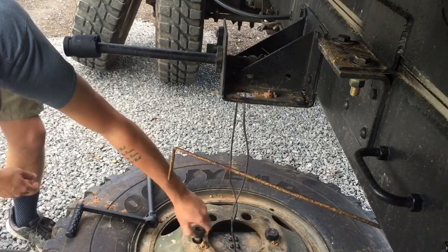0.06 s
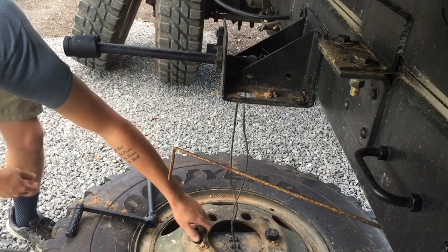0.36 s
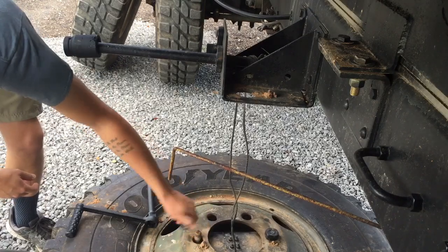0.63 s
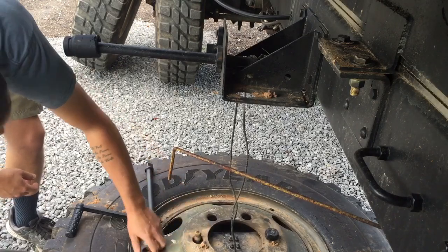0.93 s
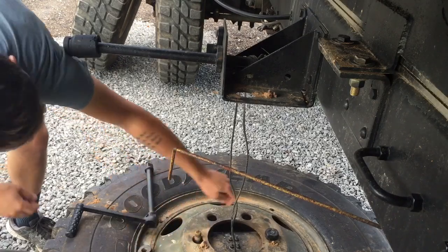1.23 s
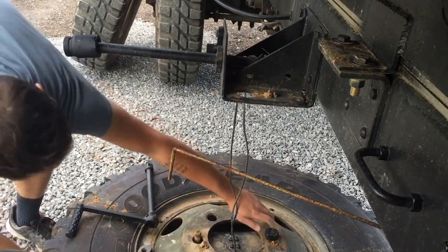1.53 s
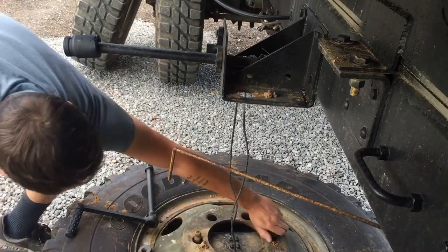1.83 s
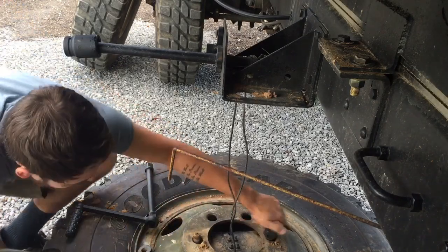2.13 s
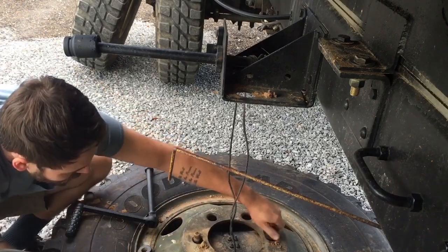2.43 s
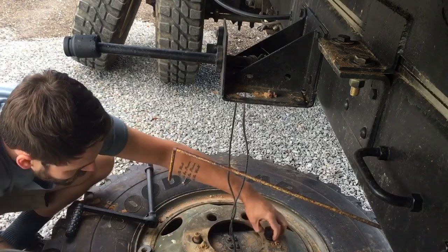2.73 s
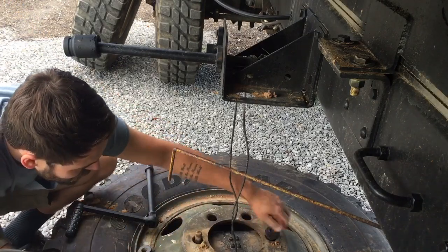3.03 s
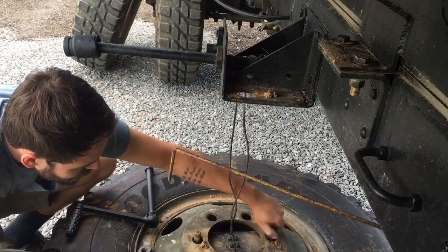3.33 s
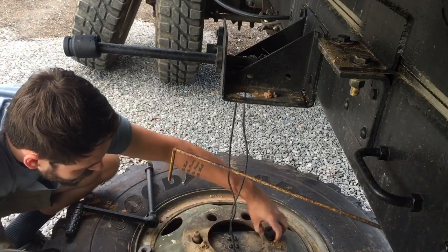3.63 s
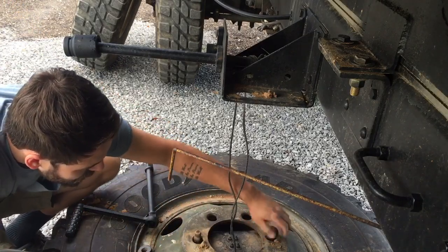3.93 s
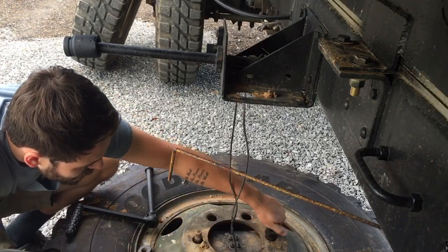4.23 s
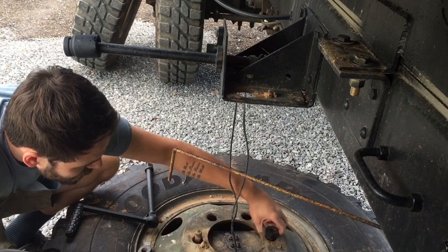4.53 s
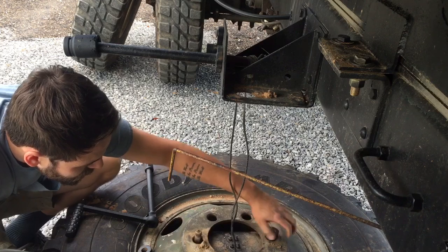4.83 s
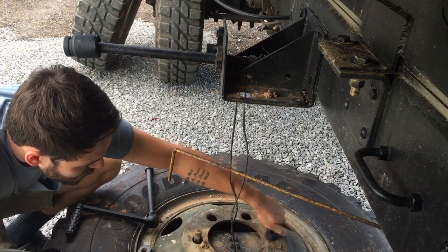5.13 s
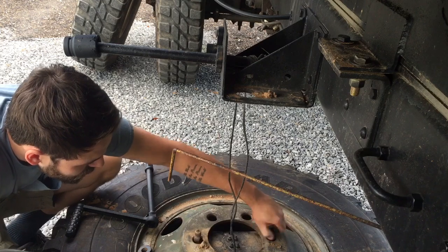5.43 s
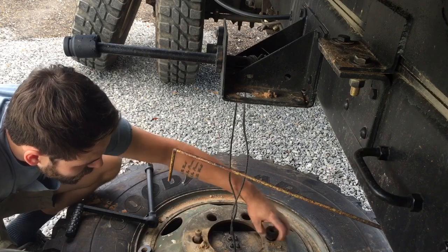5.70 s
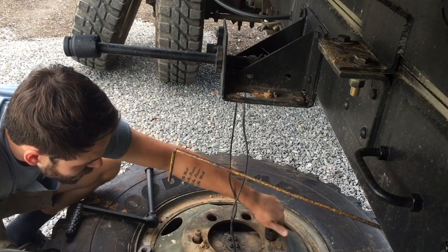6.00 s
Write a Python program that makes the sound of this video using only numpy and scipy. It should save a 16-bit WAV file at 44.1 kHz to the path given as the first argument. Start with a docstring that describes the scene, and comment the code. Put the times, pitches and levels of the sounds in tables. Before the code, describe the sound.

Outdoors, loose nuts click and scrape on a steel wheel's studs in short, ringing bursts, over a faint, distant engine idle.

```python
"""Lug nuts spun by hand on the studs of a steel truck wheel lying on gravel outdoors.
A loose nut rasps and knocks on its thread, ringing itself, the stud and the wheel;
once the dry thread squeals by stick-slip. Steel clacks twice, a sleeve brushes, a shoe grinds gravel.
Far off, an engine idles and insects shrill."""
import sys
import numpy as np
from scipy import signal
from scipy.fft import rfft, irfft, next_fast_len
from scipy.io import wavfile
from scipy.ndimage import map_coordinates

SR = 44100
rng = np.random.default_rng(int(sys.argv[2]) if len(sys.argv) > 2 else 0)


def file_out(sig):
    """Save sig as 16-bit WAV at sys.argv[1]."""
    # one column per channel
    cols = np.atleast_2d(sig).T
    # limit, then scale
    lim = np.clip(cols, -1, 1)
    pcm = np.round(lim * 32767).astype(np.int16)
    wavfile.write(sys.argv[1], SR, pcm)


N = 267246
TIME = np.arange(N) / SR
RING_TIME = TIME[:SR // 3]
LEAD_S = .03  # run-up before a rattle or chirp


def undb(db):
    """Decibels to gain."""
    return 10 ** (np.asarray(db) / 20)


def unit(x, span_s=None):
    """Scale to rms 1, over the first span_s if given."""
    return x / np.sqrt(np.mean(x[:int(span_s * SR) if span_s else None] ** 2) + 1e-20)


def add(out, start_s, x):
    """Mix x into out from start_s."""
    i = int(start_s * SR)
    x, i = x[max(-i, 0):], max(i, 0)
    out[i:i + len(x)] += x[:N - i]


def colour(x, points):
    """Minimum-phase filter through (f/Hz, level/dB) points."""
    size = 2 * next_fast_len(len(x))
    hz, db = np.transpose(points)
    bins_hz = np.arange(size // 2 + 1) * SR / size
    gain = undb(np.interp(np.log(bins_hz + 1), np.log(hz), db))
    cepstrum = irfft(np.log(gain))
    cepstrum[1:size // 2] *= 2
    cepstrum[size // 2 + 1:] = 0
    return irfft(rfft(x, size) * np.exp(rfft(cepstrum)))[:len(x)]


def walk(rate_hz, like=TIME):
    """Smooth random drift, spread near 1."""
    knots = rng.standard_normal(int(len(like) / SR * rate_hz) + 3)
    return map_coordinates(knots, [np.arange(len(like)) / SR * rate_hz], order=2, mode="nearest")


def drive(force, response):
    """Sound of a body under a force."""
    return signal.fftconvolve(force, response)[:len(force)]


def ring(modes, scatter_db=4.5, detune=.001, damping=1.034):
    """Modal impulse response; each contact point weights the modes anew, fingers damp them."""
    out = 0
    for (hz, db, t60_s), (gain, shift, sign) in zip(modes, rng.standard_normal((len(modes), 3))):
        phase = 2 * np.pi * hz * (1 + detune * shift) * RING_TIME
        decay = np.exp(-np.log(1000) * damping * RING_TIME / t60_s)
        out = out + np.sign(sign) * undb(db + scatter_db * gain) * np.sin(phase) * decay
    return out


def dense_ring(t60_s, late_db, late_t60_s):
    """Countless short modes as decaying noise, plus a faint longer echo."""
    decay = -np.log(1000) * RING_TIME
    envelope = np.exp(decay / t60_s) + undb(late_db) * np.exp(decay / late_t60_s)
    return rng.standard_normal(len(RING_TIME)) * envelope


def chatter(attack_s, hold_s, release_s, rate_hz, spread_db, rub_db=-16, rub_s=.006):
    """Tiny impacts: a light rub for LEAD_S, then the nut catches, rocks and settles."""
    t = TIME[:SR // 2] - LEAD_S
    swell = np.sqrt(np.clip(t / attack_s, 0, 1)) * np.exp(-np.maximum(t - hold_s, 0) / release_s)
    rub = undb(rub_db) * np.exp(-np.abs(t) / rub_s)
    hits = (rng.random(len(t)) < rate_hz / SR) * rng.choice([-1, 1], len(t))
    return (swell + rub) * hits * undb(spread_db * rng.standard_normal(len(t)))


def air(level_db=-65):
    """Faint open-air hiss."""
    # f/Hz, level/dB
    spectrum = [(150, -12), (300, -4), (450, -3), (800, -2), (1500, -9), (2500, -13), (3700, -13),
                (5000, -18), (6200, -17), (7500, -14), (9500, -22), (15500, -23)]
    return unit(colour(rng.standard_normal(N), spectrum)) * undb(level_db + .5 * walk(5))


def engine(rumble_db=-48, waver=.008, throb_db=1.5):
    """Distant idle: orders waver with engine speed over a rumble."""
    # engine orders: f/Hz, level/dB
    orders = [(52, -58), (77, -60.5), (103, -56.5), (124, -48), (154, -55.5), (205, -57.5), (229, -70),
              (247, -68.5)]
    # f/Hz, level/dB
    rumble_spectrum = [(20, -28), (35, -20), (52, 0), (75, -1.5), (130, 3.5), (175, -7), (235, -2),
                       (290, -17.5), (450, -25.5), (1000, -63.5)]
    speed = 1 + waver * walk(3)
    hum = 0
    for hz, db in orders:
        amplitude = np.sqrt(2) * undb(db + throb_db * walk(9))
        phase = 2 * np.pi * np.cumsum(hz * speed) / SR + .5 * walk(11)
        hum += amplitude * np.sin(phase)
    return hum + undb(rumble_db) * unit(colour(rng.standard_normal(N), rumble_spectrum))


def insects(hz=6850, level_db=-76, swell_db=2.5):
    """Thin, far shrill that comes and goes."""
    band = [(hz - 1200, -40), (hz - 300, -14), (hz - 90, 0), (hz + 90, 0),
            (hz + 300, -10), (hz + 900, -12), (hz + 2000, -40)]
    return unit(colour(rng.standard_normal(N), band)) * undb(level_db + swell_db * walk(9.6))


def sleeve(peak_s=1.36, width_s=.06, level_db=-68):
    """Cloth hisses as the arm reaches across."""
    hiss = unit(colour(rng.standard_normal(N), [(1000, -14), (7000, 0), (11000, -4), (15000, -1)]))
    return undb(level_db) * hiss * np.exp(-((TIME - peak_s) / width_s) ** 2)


def shoe(rate_hz=3000, spread_db=3.5, tail_s=.0037, hiss_db=-4, split_hz=1700):
    """Stones grind under a sole: dense short grains and a few lone snaps."""
    # gravel spectrum: f/Hz, level/dB
    gravel = [(100, -12), (220, -0.5), (350, 0), (520, -4), (750, -0.5), (1150, -1.5), (1600, -10),
              (2200, -11), (5000, -19.5), (8400, -22.5), (15500, -31.5)]
    # sole presses: peak t/s, rise/s, fall/s, level/dB, treble/dB
    scuffs = [(1.787, 0.0044, 0.017, -38.5, -14), (1.889, 0.087, 0.064, -36, 2.5),
              (2.188, 0.035, 0.018, -47, 5.5), (2.27, 0.0056, 0.022, -35, -14),
              (2.321, 0.0085, 0.031, -43, -1.5), (2.549, 0.076, 0.065, -43, -9), (2.9, .4, .2, -62.5, -22)]
    # snapping stones: t/s, level/dB, f/Hz
    stones = [(1.68, -53.5, 3480), (1.706, -50, 4360), (1.784, -44.5, 1650), (1.893, -42, 3030),
              (2.188, -65, 13000), (2.251, -58, 9000), (2.283, -46.5, 9200)]
    grains = (rng.random(N) < rate_hz / SR) * rng.standard_normal(N)
    grains *= undb(spread_db * np.minimum(rng.exponential(size=N), 4))
    tail = rng.standard_normal(len(RING_TIME)) * np.exp(-RING_TIME / tail_s)
    grind = unit(drive(grains, tail)) + unit(grains) + undb(hiss_db) * rng.standard_normal(N)
    crunch = unit(colour(grind, gravel)) * undb(walk(60))
    low = signal.sosfiltfilt(signal.butter(2, split_hz, fs=SR, output="sos"), crunch)
    out = np.zeros(N)
    for peak_s, rise_s, fall_s, db, treble_db in scuffs:
        width_s = np.where(TIME < peak_s, rise_s, fall_s)
        weight = np.exp(-np.abs((TIME - peak_s) / width_s) ** 1.3)
        out += undb(db) * weight * (low + undb(treble_db) * (crunch - low))
    for start_s, db, hz in stones:
        burst = dense_ring(t60_s=.02, late_db=-25.5, late_t60_s=.08)
        snap = colour(burst, [(hz / 5, -18), (hz, 0), (3 * hz, -18)])
        add(out, start_s, undb(db) * unit(snap, span_s=.0024))
    return out


def clacks(crack_db=-6, crack_s=.0012):
    """Steel set down on steel: a crack and a short, hand-damped ring."""
    # t/s, level/dB, ring/dB, spectrum (f/Hz, level/dB)
    blows = [(0.8939, -28, -8.5, [(150, -12), (420, -4), (900, -14), (2000, -18), (2600, -2.5),
             (3400, -4.5), (4200, -11), (8000, -11.5), (11000, -26), (15000, -52)]),
             (1.0322, -26.5, -12, [(150, -9), (300, -22), (430, 6), (700, -2.5), (1150, -5), (2000, -15.5),
             (3500, -13), (5000, -21), (7000, -26), (10000, -51), (15000, -64)])]
    # set-down steel: f/Hz, level/dB, nominal t60/s
    modes = [(460, -12, .06), (600, -12, .07), (1210, -7, .12), (1830, -12, .075), (2455, -4, .11),
             (3537, 0, .12), (4760, -11, .075), (6412, -8, .08), (7892, -12, .06)]
    out = np.zeros(N)
    for start_s, db, ring_db, spectrum in blows:
        crack = unit(rng.standard_normal(len(RING_TIME)) * np.exp(-RING_TIME / crack_s))
        body = unit(dense_ring(t60_s=.06, late_db=-30, late_t60_s=.22))
        body += undb(ring_db) * unit(ring(modes, scatter_db=0))
        clack = colour(body + undb(crack_db) * crack, spectrum)
        add(out, start_s, undb(db) * unit(clack, span_s=.017))
    return out


def chirp(hold_s, hz, rough_rad, glide_hz_per_s=0, attack_s=.0045, release_s=.007):
    """Brief stick-slip tone: grows for LEAD_S, holds, dies."""
    t = RING_TIME - LEAD_S
    phase = 2 * np.pi * (hz * t + glide_hz_per_s * t ** 2 / 2) + rough_rad * walk(700, t)
    return np.exp(np.minimum(t, 0) / attack_s - np.maximum(t - hold_s, 0) / release_s) * np.sin(phase)


def thread_tone(mode_hz=4467, flat_hz=195, waver=.0063, level_db=-10.5, flutter_db=2.3):
    """The dry thread sings by stick-slip, flat until it locks to its mode."""
    start_s, attack_s, hold_s, release_s = 1.949, .015, .038, .019
    lock_s, glide_s = 1.965, .002
    hz = mode_hz - flat_hz * (1 - np.tanh((TIME - lock_s) / glide_s)) / 2
    phase = 2 * np.pi * np.cumsum(hz * (1 + waver * walk(400))) / SR
    second = undb(-14) * np.sin(2 * phase + .35 * walk(900))
    third = undb(-33) * np.sin(3 * phase + .7 * walk(900))
    t = TIME - start_s
    envelope = np.clip(t / attack_s, 0, 1) * np.exp(-np.maximum(t - hold_s, 0) / release_s)
    return envelope * (np.sin(phase) + second + third) * undb(level_db + flutter_db * walk(250))


def squeal(skid_s=2.046, skid_db=-22, rasp_s=2.01, rasp_db=-32, echo_db=-19):
    """The thread's tone hops between modes, skids down and breaks into a rasp."""
    # mode hops: full-strength t/s, hold/s, f/Hz, level/dB
    hops = [(1.955, .045, 3172, -38.5), (2.011, 0.0028, 5280, -13), (2.011, 0.0025, 6150, -15.5),
            (2.014, 0.0035, 11580, -25.5), (2.017, 0.003, 7120, -21.5), (2.022, 0.021, 3220, -22.5),
            (2.028, 0.01, 5320, -21.5), (2.085, .018, 1770, -17.5), (2.085, 0.004, 3550, -22.5),
            (2.094, .008, 3185, -22.5), (2.486, .003, 3980, -29)]
    out = thread_tone()
    for full_s, hold_s, hz, db in hops:
        add(out, full_s - LEAD_S, undb(db) * chirp(hold_s, hz, rough_rad=.25))
    skid = chirp(hold_s=.016, hz=4900, rough_rad=1.8, glide_hz_per_s=-60000)
    add(out, skid_s - LEAD_S, undb(skid_db) * skid)
    force = chatter(attack_s=.006, hold_s=.008, release_s=.032, rate_hz=6000, spread_db=5)
    rasp = colour(force, [(800, -21.5), (3000, -7.5), (5500, 1), (8000, -9), (10500, -10),
                          (11600, -6.5), (12800, -21.5), (15500, -16.5)])
    add(out, rasp_s - LEAD_S, undb(rasp_db) * unit(rasp, span_s=.085))
    echo = dense_ring(t60_s=.1218, late_db=-13.5, late_t60_s=.25)
    return out + undb(echo_db) * drive(out, echo / np.sqrt(np.sum(echo ** 2)))


def steel(force, span_s, bass, treble_db, lean_db, stud_db, looseness):
    """Chatter rings wheel, rim, stud and nut; looseness 1 is a light grip, higher rings more."""
    # modes: f/Hz, level/dB, nominal t60/s
    wheel = [(690, -4, .08), (1110, -4, .08), (1225, -5, .09), (1650, 2, .07), (2268, -4, .13),
             (2455, -4, .09), (2600, 0, .11), (2810, -2, .08), (3590, -1, .09), (3705, -2, .13),
             (3880, -4, .09), (4935, -5, .12), (5830, -11, .08), (6120, -6, .1), (6740, -12, .11),
             (6900, -9, .14), (7140, -8, .18), (7755, -17, .12), (7885, -13, .12), (8530, -23, .1),
             (8660, -24, .1), (9285, -24, .12), (9480, -25, .1), (9745, -25, .1), (11530, -29, .1),
             (11720, -25, .11), (12600, -31, .08), (14330, -28, .1)]
    rim = [(745, -7, .07), (774, -1, .1), (1690, -7, .06), (1745, -4, .08), (1775, 0, .11)]
    stud = [(3066, -1, .1), (3160, 0, .1), (3195, -1, .17)]
    nut = [(4517, 0, .16), (4540, -10, .1)]
    # dense ring of wheel and surroundings: f/Hz, level/dB
    clatter = [(120, -16), (300, -3.5), (550, -5.5), (750, 3.5), (1000, 4.5), (1550, 4.5), (2050, -3),
               (2800, -1.5), (3800, 3), (4300, -8), (5300, -12), (6000, -6), (7800, -24.5), (9500, -30.5),
               (10500, -50.5), (15500, -39.5)]
    direct = 1 + undb(1) * np.exp(-RING_TIME / .002)  # tick straight from the contact
    dense = direct * dense_ring(t60_s=.05, late_db=-17, late_t60_s=.22)
    body = unit(colour(dense, clatter)) + unit(ring(wheel))
    # heavy contact brings out bass, hard contact treble
    body = colour(body, [(200, .62 * bass), (550, .71 * bass), (1400, 0), (3800, 0), (7000, treble_db),
                         (9000, .4 * treble_db), (10200, -7), (12000, -4 + .1 * treble_db)])
    sound = unit(drive(force, body), span_s)
    looseness = max(looseness, .3)
    grip, boost_db = 1 / looseness, 9.5 * (looseness - 1)
    for modes, db, damping in ((rim, -5 - lean_db, 1), (stud, stud_db, grip), (nut, -14 + lean_db, grip)):
        ringing = drive(force, ring(modes, damping=damping))
        sound += undb(db + boost_db) * unit(ringing, span_s)
    return unit(sound, span_s)


def nut_turns(attack_s=.012, release_s=.0076, uneven_db=2.5):
    """Each finger flick spins the nut, which rasps lightly on its thread."""
    # t/s, hold/s, level/dB, treble/dB, stud ring/dB
    turns = [(0.053, 0.22, -50.5, 0.5, -2.5), (0.517, 0.027, -50, -1, -1), (2.019, .1, -36.5, 11, -1.5),
             (2.423, 0.13, -37.5, -4, 4), (2.857, .13, -43, -8, -7.5), (3.271, .033, -54, -4.5, -3),
             (3.345, 0.13, -33, -5.5, -7.5), (3.737, 0.042, -49.5, -1, -1),
             (3.791, 0.091, -44.5, 0.5, -5.5), (4.18, .11, -42, -1, -9), (4.615, .06, -44.5, -13, -2.5),
             (4.702, 0.062, -43.5, 5, -4.5), (5.053, 0.158, -45.5, -7.5, -5), (5.455, 0.12, -44, -1.5, 0.5),
             (5.871, .18, -42.5, -3, -2)]
    out = np.zeros(N)
    for start_s, hold_s, db, treble_db, stud_db in turns:
        force = chatter(attack_s, hold_s, release_s, rate_hz=900, spread_db=5, rub_db=-7, rub_s=.012)
        force *= undb(uneven_db * walk(50, force))
        rasp = steel(force, LEAD_S + hold_s + release_s, bass=-.5, treble_db=treble_db,
                     lean_db=-1.5, stud_db=stud_db, looseness=1.17)
        add(out, start_s - LEAD_S, undb(db) * rasp)
    return out


def nut_knocks(attack_s=.0026, release_s=.0084):
    """The nut catches in short, hard rattles; dull ones lose treble, strong ones gain it."""
    # t/s, hold/s, level/dB, dullness, lean from rim (-) to nut (+)/dB, stud ring/dB, looseness
    knocks = [(0.0, 0.0052, -45, 9, -2, -5, 1.2), (0.105, 0.018, -44.5, 7, -2, -2, 1),
              (0.14, 0.0098, -34.5, 1.5, -2.5, 8.5, 0.59), (0.204, 0.0059, -45.5, 8, -13, -7, 0.67),
              (0.274, .007, -51.5, -4, -8, -7, .9), (0.399, .006, -51.5, 38, -6, -18, 0.28),
              (0.528, .024, -45.5, -1, -9.5, -10.5, 0.64), (2.112, 0.0061, -27, 11.5, 3.5, -3, 1.09),
              (2.266, 0.011, -48.5, 35, 0, 0, 0.62), (2.432, 0.0074, -34.5, 27, -2, 1, 0.76),
              (2.592, .006, -43, 35, -3.5, -2, 0.45), (2.866, 0.0081, -39, -1, -3, -9, 1.4),
              (2.956, 0.017, -23.5, -3, 1, 2.5, 0.67), (3.361, 0.005, -26, -9, 0.5, -1.5, 1.26),
              (3.394, 0.02, -30, 1, -3.5, -17, 0.61), (3.44, 0.0092, -28.5, -7, -2.5, -5.5, 1.18),
              (3.464, 0.011, -34.5, 17, -1.5, 2, 1.21), (3.796, 0.0092, -42.5, -8, 0, -8, 2),
              (3.889, 0.013, -47, 10.5, 2, -4.5, 1.05), (4.188, 0.011, -25.5, -15, 0.5, -5, 1.24),
              (4.2857, 0.0069, -21, -13.5, 8, -7.5, 0.87), (4.617, 0.024, -30, -13, -11, -4, 1.26),
              (4.979, .008, -58.5, 22, -12, -8, .9), (5.099, 0.014, -36, -0.5, -8, -4.5, 1.45),
              (5.226, 0.0087, -36.5, 4.5, 4.5, -7, 1.28), (5.483, 0.015, -39, 4.5, -4, 1.5, 0.88),
              (5.539, 0.0032, -31.5, 14.5, 1, -1.5, 0.87), (5.551, 0.017, -30.5, -9, -1.5, -0.5, 0.92),
              (5.587, 0.01, -41.5, 6, -9, -7, 1.07), (5.866, 0.012, -35.5, 19.5, -4.5, -3, 0.73),
              (5.905, 0.0071, -33.5, 2, 16, 0, 1.25), (5.922, .013, -20.5, -25, -0.5, -2, 1.16),
              (6.031, 0.0053, -42, -3, -6, -8, 0.95)]
    out = np.zeros(N)
    for start_s, hold_s, db, dullness, lean_db, stud_db, looseness in knocks:
        force = chatter(attack_s, hold_s, release_s, rate_hz=2600, spread_db=6)
        treble_db = -3.5 - .41 * max(dullness, -6) + .22 * db
        knock = steel(force, LEAD_S + hold_s + release_s, dullness, treble_db, lean_db, stud_db, looseness)
        add(out, start_s - LEAD_S, undb(db) * knock)
    return out


def scene():
    """Mono sum of all sources."""
    metal = nut_turns() + nut_knocks() + clacks() + squeal()
    return (metal + shoe() + sleeve() + insects() + engine() + air())[None]


def record(dry, top_hz=15800):
    """Steep low-pass."""
    return signal.sosfilt(signal.ellip(10, .1, 80, top_hz, fs=SR, output="sos"), dry)


dry = scene()
out = record(dry)
file_out(out)
```